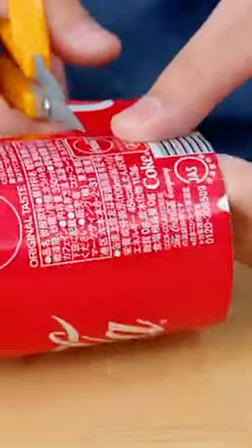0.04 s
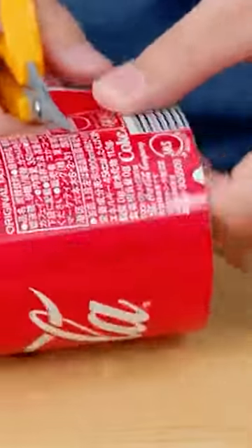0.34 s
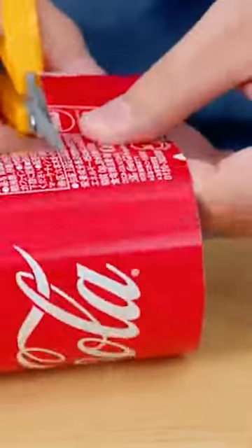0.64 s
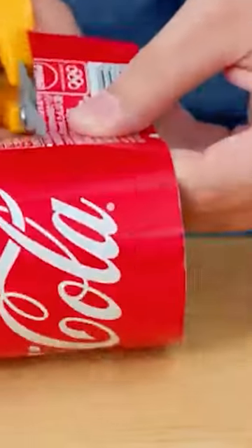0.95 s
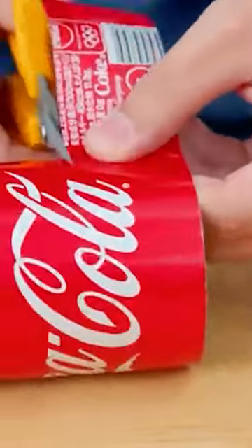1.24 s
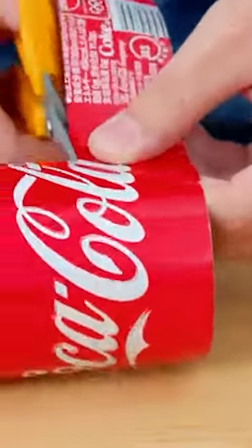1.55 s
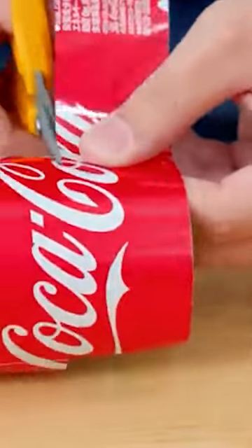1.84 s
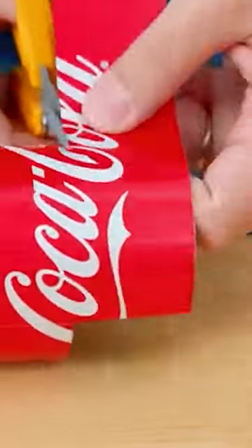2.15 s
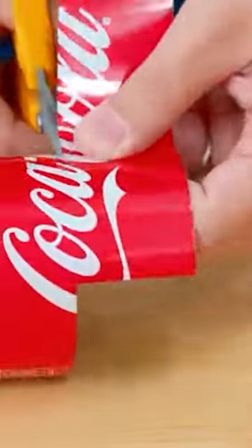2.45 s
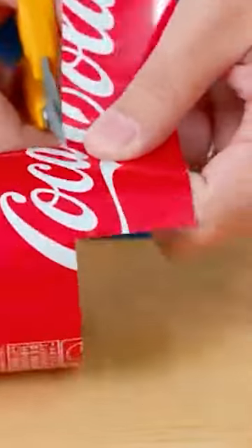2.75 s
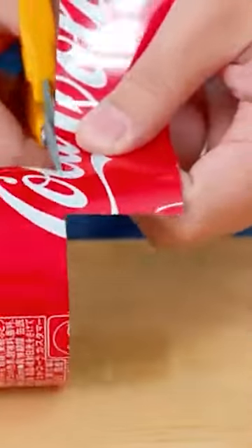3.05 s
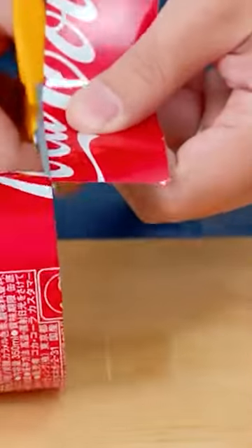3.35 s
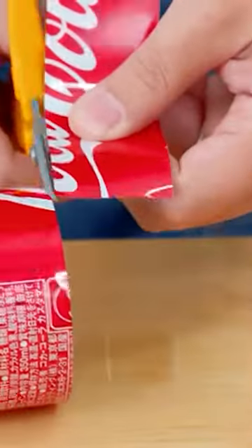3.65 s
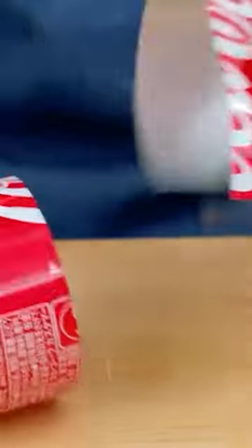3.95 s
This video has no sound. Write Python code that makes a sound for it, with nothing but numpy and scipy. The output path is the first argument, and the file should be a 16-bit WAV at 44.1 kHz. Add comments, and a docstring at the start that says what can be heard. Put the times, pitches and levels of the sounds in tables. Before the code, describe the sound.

Scissors snip through a thin aluminium can in crackly bites, then snap shut.

```python
"""Scissors cut the thin wall of an aluminium can, close to the microphone, over a wooden table.
Each bite is a short swell of tiny fractures that hisses, rings the hand-damped wall and flexes the sheet.
The blades snap shut; the freed piece slides off a blade with a ringing ping and taps down on the table.
The cutting spreads across the stereo pair, snap and taps sit centre; a small room hums faintly behind."""
import sys
import numpy as np
from scipy import signal
from scipy.fft import rfft, irfft
from scipy.io import wavfile
from scipy.ndimage import map_coordinates

SR = 44100
rng = np.random.default_rng(int(sys.argv[2]) if len(sys.argv) > 2 else 0)


def inscribe(sig):
    """Save sig as 16-bit PCM at rate SR to the path in sys.argv[1].

    A 1-D sig is mono; a 2-D sig holds one channel per row.
    Samples are clipped to [-1, 1] before scaling.
    """
    pcm = np.round(np.clip(np.atleast_2d(sig).T, -1, 1) * 32767)
    wavfile.write(sys.argv[1], SR, pcm.astype(np.int16))


N = 176400
T = np.arange(SR // 2) / SR
SIDES = np.array([[1], [-1]])  # left, right

# The small room's decay. Each row: frequency in Hz, t60 in seconds.
ROOM_DECAY = [(200, 0.15), (2000, 0.16), (14000, 0.047)]
# Noise colours. Each row: frequency in Hz, relative level in dB.
HUM_SPECTRUM = [(25, -26), (100, 5.5), (250, -10), (2000, -18.5), (16000, -33.5)]  # room tone
KNOCK_SPECTRUM = [(100, -27), (600, 29), (3400, 17.5), (4500, 7), (12000, -54)]  # the piece on the table
METAL_SPECTRUM = [(300, -16), (1100, -3.5), (1680, 10), (2800, 2), (3900, -7), (7000, 2.5), (10000, -2),
                  (16000, 0)]  # the snap and the ping
FLEX_SPECTRUM = [(70, -29.5), (170, -8), (420, 5.5), (1000, -2), (3000, -52)]  # the sheet bending
CRACKLE_SPECTRUM = [(700, -65), (2100, -1.5), (3700, -3), (5300, 2.5), (6300, -0.5), (8200, 0.5),
                    (16000, -1.5)]  # fractures and hard contacts
WALL_SPECTRUM = [(400, -30.5), (880, -10.5), (1170, 3), (1400, 1), (1850, -4), (2300, -21.5), (6000, -50.5)]  # the ringing wall, before WALL_TUNING shifts it
# The wall's ring rises early in the cut. Each row: time in seconds, frequency ratio.
WALL_TUNING = [(.2, 0.96), (.92, 1.178)]
# Ringing metal. Each row: frequency in Hz, relative level in dB, t60 in seconds.
PIECE_MODES = [(390.4, -12.5, 0.46), (796, -5, 0.26), (1200, -10, 0.39), (1375, 5.5, 0.087),
               (1595, -2, 0.47), (2090, -8, 0.3), (2860, -13, 0.63), (3170, 0, .15)]  # the loose piece
BLADE_AND_STRIP_MODES = [(1965, -4, 0.047), (2733, 2.5, 0.21), (3400, -7.5, 0.2), (5120, 3.5, 0.11),
                         (8960, 14, 0.05), (11270, 16.5, 0.033)]
CAN_MODES = [(1199, 9.5, 0.067), (1860, -6, 0.075)]  # the can in the hand
# The piece lands. Each row: time in seconds, knock level in dB, scrape in dB, edge tick in dB.
TABLE_TAPS = [(3.754, -49.5, -97, -59.5), (3.8877, -57.5, -65.5, -47), (3.9098, -102, -68.5, -53),
              (3.933, -56, -68, -69)]
# The blades snap shut; in the last row the freed piece slides off a blade with a ringing ping.
# Each row: start in seconds, level in dB, attack time constant in ms, t60 of the noise burst in seconds,
# ring relative to the burst in dB.
SNAP_AND_PING = [(3.352, -59.5, 6.2, 0.036, -11.5), (3.516, -56.5, 0.084, 0.019, -21),
                 (3.5477, -32, 0.38, 0.038, -8.5), (3.682, -47, 13.6, 0.06, -5)]
# A blade rubs the wall without cutting. Each row: peak time in seconds, level in dB.
BLADE_RUBS = [(0.348, -59), (0.399, -56.5), (0.84, -56.5), (1.037, -63), (1.162, -63.5), (1.361, -57),
              (1.685, -56.5), (2.174, -59), (2.273, -61.5), (2.344, -68.5), (2.46, -66.5), (2.622, -61.5)]
SINGING_RUBS = [(0.51, -50), (0.583, -44), (1.069, -42.5)]  # these keep the can's lowest mode sounding
# The blades bite. Each row: peak time in seconds, rise over the last 10 dB in ms, flex level in dB,
# wall ring in dB, crackle in dB, frequency in Hz above which the crackle dulls.
BLADE_BITES = [ (0.014, 4.52, -55, -31, -42.5, 8200), (0.076, 4.1, -62, -41.5, -55, 8740),
               (0.136, 5.1, -65, -34.5, -49.5, 8400), (0.179, 5.6, -71, -42.5, -57.5, 11000),
               (.198, 4.5, -92, -43, -59, 10700), (0.234, 7.1, -62, -56, -60.5, 10700),
               (0.252, 9.4, -58.5, -45.5, -57.5, 10100), (0.284, 5.9, -93, -49.5, -62.5, 11900),
               (0.418, 8.2, -60, -46, -51, 11300), (0.569, 5.1, -65, -37.5, -45.5, 9400),
               (0.596, 14, -76, -48, -56.5, 9000), (.733, 7.3, -63.5, -52, -60.5, 12100),
               (0.754, 7.2, -66.5, -47, -43, 13500), (0.92, 4.8, -60, -34, -31, 11700),
               (1.082, 9.9, -63.5, -44.5, -42, 14300), (1.107, 8.6, -66.5, -69, -44.5, 10300),
               (1.244, 11, -57, -48, -49, 9200), (1.275, 6.1, -46.5, -39, -47, 9900),
               (1.406, 7.2, -64.5, -37, -39, 12400), (1.428, 5, -61.5, -56, -37.5, 7700),
               (1.566, 7, -46.5, -47.5, -46.5, 13600), (1.709, 8.7, -88.5, -45.5, -50.5, 11400),
               (1.739, 3.53, -54, -39.5, -28.5, 16000), (1.925, 4.3, -70, -65.5, -39.5, 14400),
               (2.048, 7.9, -114, -81, -52, 13900), (2.088, 4, -105, -79.5, -38.5, 14000),
               (2.496, 4.4, -60.5, -45.5, -52, 11900), (2.588, 4.3, -55, -48, -52.5, 10500),
               (2.686, 8.5, -68.5, -67.5, -56.5, 14700), (2.748, 6.2, -57.5, -55, -59.5, 13000),
               (2.890, 6.3, -57.5, -59, -53, 8800), (3.008, 4.4, -53.5, -53.5, -44.5, 13800),
               (3.129, 4.28, -45.5, -47, -33.5, 14200), (3.228, 4.46, -50.5, -42.5, -35, 10500),
               (3.275, 3.6, -86, -58, -47, 14100), (3.313, 3.8, -63, -47, -33, 16200)]
# The nearly free strip hangs on longer. Each row: time in seconds, a swell's fall time over its rise.
FALL_RATIO = [(2, 1.13), (3.1, 1.84)]

CRACKLE_SPREAD, WALL_SPREAD = 1.3, 0.85  # stereo width as phase lean in radians


def amp(db):
    """Decibels to gain."""
    return 10 ** (np.asarray(db) / 20)


def decay(t60):
    """An envelope that falls 60 dB in t60 seconds."""
    return amp(-60 * T / t60)


def along(points, hz):
    """Read (Hz, value) points on a log frequency axis."""
    freqs, values = np.transpose(points)
    return np.interp(np.log(hz + 1), np.log(freqs + 1), values)


def add(out, start_s, sound):
    """Mix a sound into out from start_s."""
    at = round(start_s * SR) + np.arange(sound.shape[-1])
    inside = (at >= 0) & (at < N)
    out[:, at[inside]] += sound[:, inside]


def noise(spectrum, spread=0, size=len(T), uneven_db=4.5, spacing_hz=249.5, dull_hz=SR):
    """Noise of rms 1 with random resonances; spread leans each frequency left or right in phase."""
    hz = np.fft.rfftfreq(size, 1 / SR)
    resonances, lean = (map_coordinates(rng.standard_normal(size), [hz / spacing_hz]) for _ in range(2))
    gain = amp(along(spectrum, hz) + uneven_db * resonances) / np.sqrt(1 + (hz / dull_hz) ** 10)
    phase = np.exp(1j * spread * lean * SIDES)
    coloured = irfft(rfft(rng.standard_normal(size)) * gain * phase, size)
    return coloured / np.sqrt(np.mean(coloured ** 2) + 1e-20)


def ring(modes):
    """Ringing metal, centred: decaying sines, each a little different in level every time."""
    out = np.zeros((2, len(T)))
    for hz, db, t60 in modes:
        out += amp(db + rng.normal()) * decay(t60) * np.sin(2 * np.pi * (hz * T + rng.random()))
    return out


def room_tone():
    """The faint low hum of the room."""
    return amp(-82) * noise(HUM_SPECTRUM, WALL_SPREAD, N, uneven_db=3.5)


def room_reverb(near):
    """The room answers with a short diffuse tail whose treble dies first."""
    hz, t, bands = signal.stft(rng.standard_normal((1, SR // 2)), SR, nperseg=256)
    fade = amp(-60 * t / along(ROOM_DECAY, hz)[:, None])
    tail = signal.istft(bands * fade, SR, nperseg=256)[1]
    return signal.fftconvolve(near, tail / np.linalg.norm(tail[0]), axes=1)[:, :N]


def click():
    """The dry click of a hard contact."""
    return decay(0.06) * noise(CRACKLE_SPECTRUM)


def rub(peak_s, db):
    """Start time and sound of sliding metal: a soft swell, mostly the wall's own ring."""
    return bite(peak_s, rise_ms=11, flex_db=db - 10, wall_db=db, crackle_db=db - 3, dull_hz=9400)


def loose_piece():
    """The curled sheet ticks, knocks and scrapes on the table and rings freely."""
    out = np.zeros((2, N))
    for time_s, db, scrape_db, tick_db in TABLE_TAPS:
        knock = decay(0.19) * noise(KNOCK_SPECTRUM)
        ringing = amp(-3.5) * ring(PIECE_MODES)
        add(out, time_s, amp(db) * (knock + ringing) + amp(tick_db) * click())
        add(out, *rub(time_s, scrape_db))
    return out


def singing_can(swell_s=0.0053):
    """The lowest mode of the can swells under the rubbing blade."""
    out = np.zeros((2, N))
    t = T - T.mean()
    lowest_hz = CAN_MODES[0][0]
    for peak_s, db in SINGING_RUBS:
        tone = np.sin(2 * np.pi * (lowest_hz * t + rng.random()) + WALL_SPREAD * SIDES)
        add(out, peak_s + t[0], amp(db) * tone / np.cosh(t / swell_s))
    return out


def snap_and_ping():
    """The blades snap shut; then the freed piece slides off a blade with a ringing ping."""
    out = np.zeros((2, N))
    for start_s, db, attack_ms, t60, ring_db in SNAP_AND_PING:
        burst = decay(t60) * noise(METAL_SPECTRUM, uneven_db=3.5)
        shimmer = amp(-1.5) * decay(0.22) * noise(METAL_SPECTRUM, dull_hz=12100)  # strip's high modes
        contact = amp(4.5) * click()
        ringing = amp(ring_db) * ring(BLADE_AND_STRIP_MODES)
        attack = 1 - np.exp(-T * 1000 / attack_ms)
        add(out, start_s, amp(db) * attack * (contact + burst + shimmer + ringing))
    return out


def bite(peak_s, rise_ms, flex_db, wall_db, crackle_db, dull_hz, grain_db=3, grain_hz=900, size=8192):
    """Start time and sound of a swell of fractures; the bent sheet's resonances move with each bite."""
    t = (np.arange(size) - size // 2) / SR
    fall_ms = rise_ms * np.interp(peak_s, *np.transpose(FALL_RATIO))
    from_peak = np.abs(t) * 1000 / np.where(t < 0, rise_ms, fall_ms)  # 1 where the swell is 10 dB down
    skirt_power = np.where(t < 0, 1.55, 0.85)  # steep onset, lingering tail
    swell = amp(-10 * from_peak ** np.where(from_peak < 1, 1.6, skirt_power))
    grains = map_coordinates(rng.standard_normal(size), [(t - t[0]) * grain_hz])
    hiss = noise(CRACKLE_SPECTRUM, CRACKLE_SPREAD, size, dull_hz=dull_hz)
    crackle = amp(crackle_db + grain_db * grains) * hiss
    tuning = np.interp(peak_s, *np.transpose(WALL_TUNING))
    wall = amp(wall_db) * noise([(hz * tuning, db) for hz, db in WALL_SPECTRUM], WALL_SPREAD, size)
    flex = amp(flex_db) * noise(FLEX_SPECTRUM, WALL_SPREAD, size)
    return peak_s + t[0], swell * (crackle + wall + flex)


def cutting(handling_count=70, handling_end_s=2.95):
    """Bites, rubs and faint handling, close up; all of them ring the hand-damped can."""
    out = np.zeros((2, N))
    for row in BLADE_BITES:
        add(out, *bite(*row))
    handling = [((k + rng.random()) / handling_count * handling_end_s, rng.normal(-75.5, 3.5))
                for k in range(handling_count)]
    for peak_s, db in BLADE_RUBS + handling:
        add(out, *rub(peak_s, db))
    can = ring(CAN_MODES)
    can /= np.abs(rfft(can)).max()  # unity gain at the strongest resonance
    return out + amp(-7) * signal.fftconvolve(out, can, axes=1)[:, :N]


def scene():
    """Scissors and can right at the microphone, the quiet room behind them."""
    near = cutting() + singing_can() + snap_and_ping() + loose_piece()
    return near + amp(-18.5) * room_reverb(near) + room_tone()


def record(dry, top_hz=15900):
    """The recorder cuts off steeply above its band limit."""
    return signal.sosfilt(signal.cheby1(14, 0.1, top_hz, fs=SR, output="sos"), dry)


dry = scene()
out = record(dry)
inscribe(out)
```